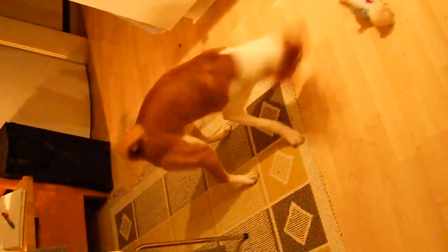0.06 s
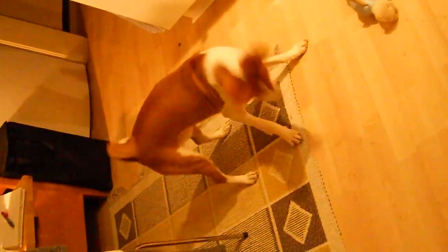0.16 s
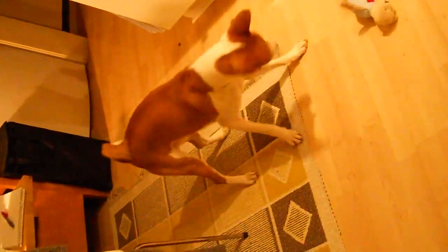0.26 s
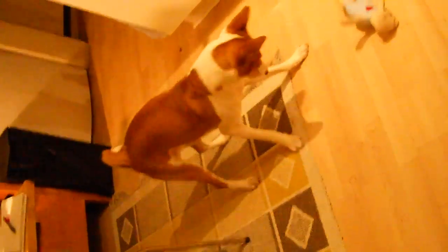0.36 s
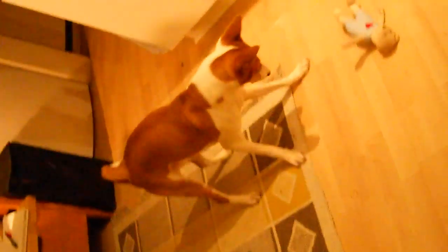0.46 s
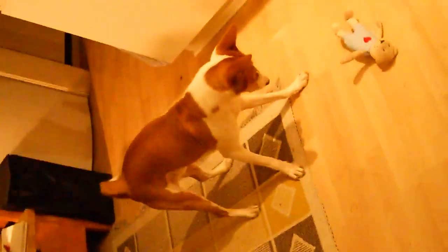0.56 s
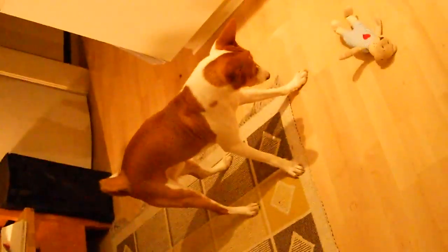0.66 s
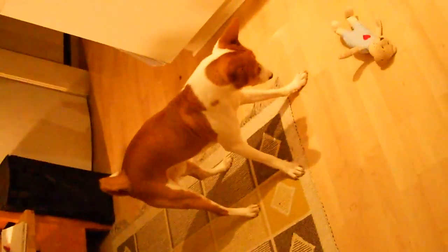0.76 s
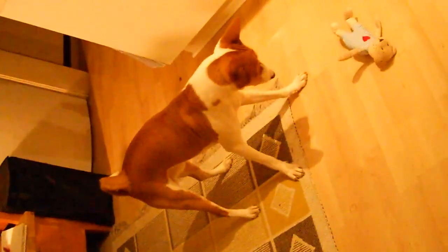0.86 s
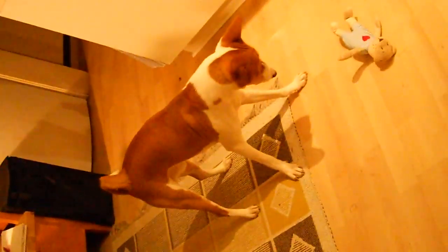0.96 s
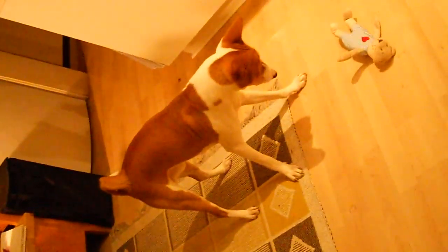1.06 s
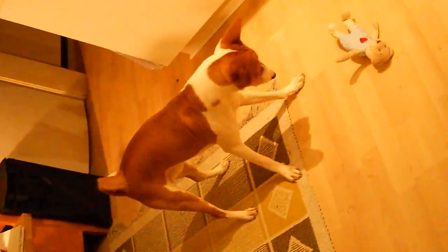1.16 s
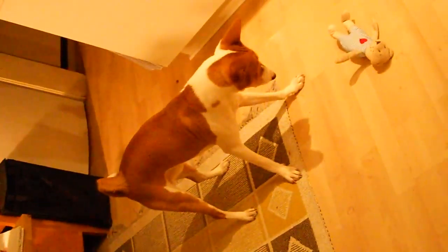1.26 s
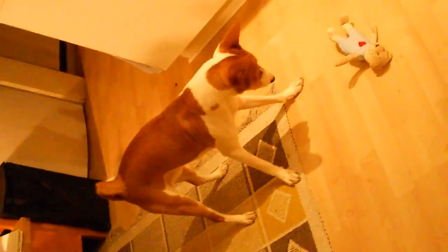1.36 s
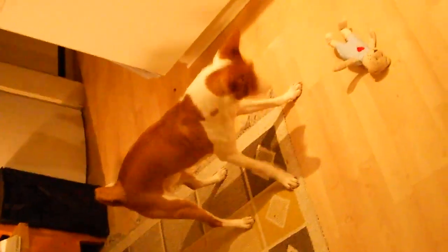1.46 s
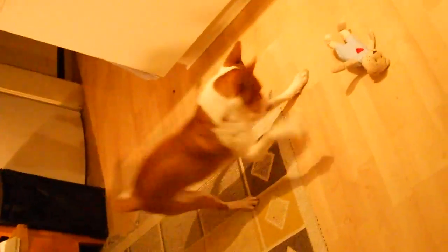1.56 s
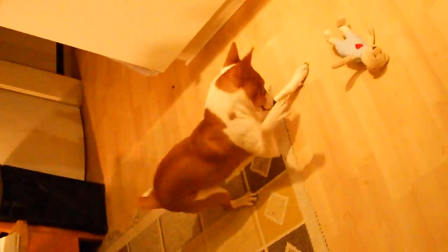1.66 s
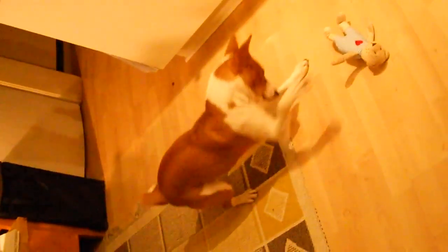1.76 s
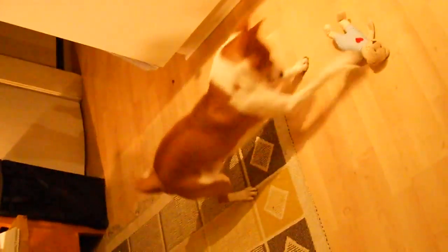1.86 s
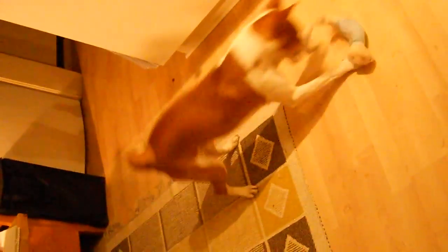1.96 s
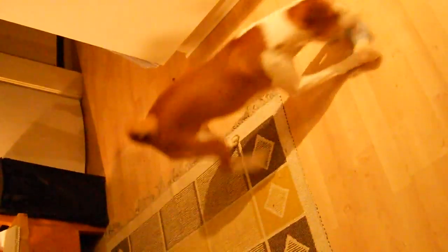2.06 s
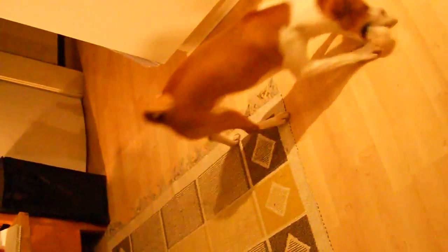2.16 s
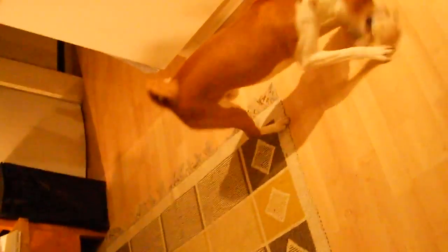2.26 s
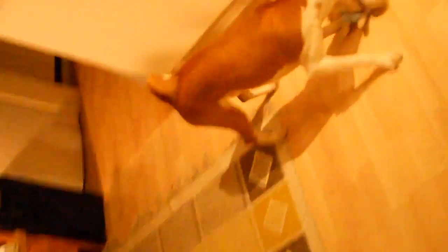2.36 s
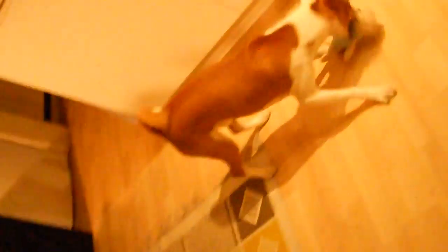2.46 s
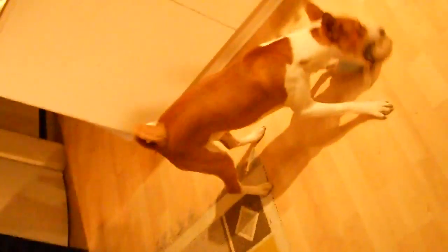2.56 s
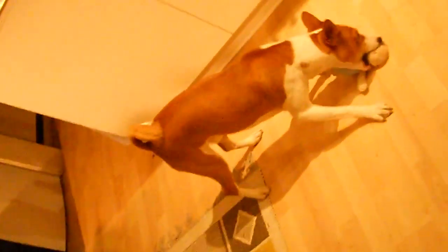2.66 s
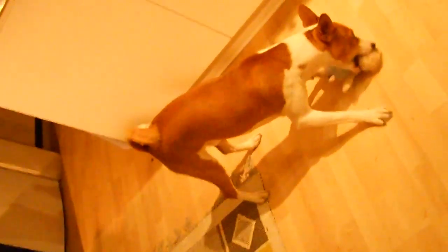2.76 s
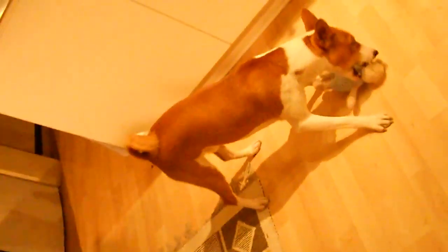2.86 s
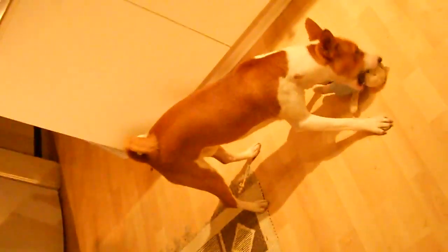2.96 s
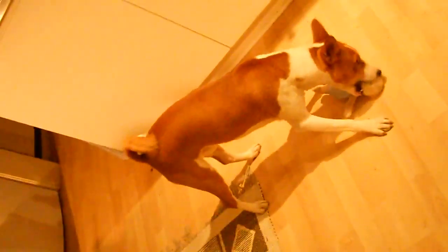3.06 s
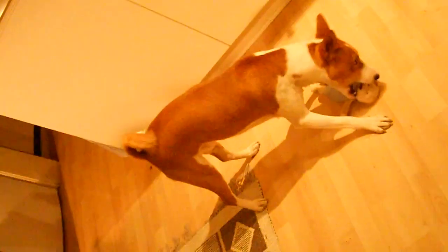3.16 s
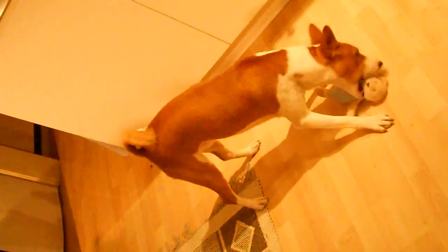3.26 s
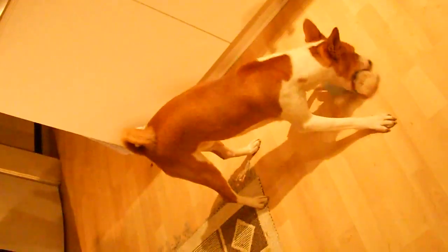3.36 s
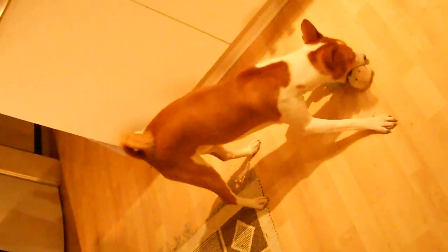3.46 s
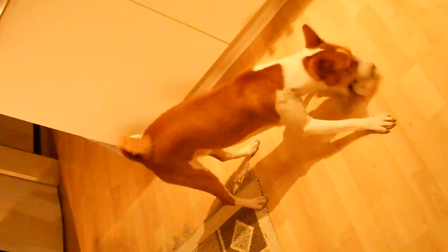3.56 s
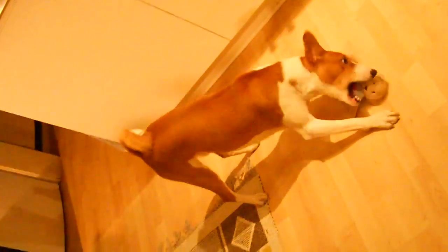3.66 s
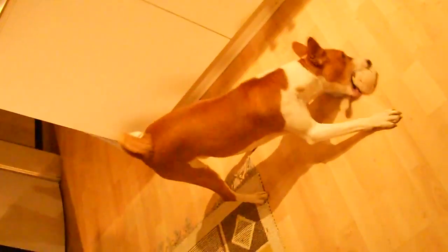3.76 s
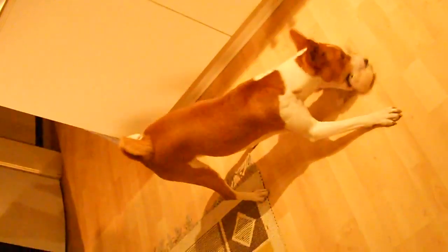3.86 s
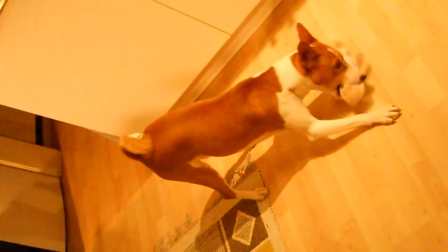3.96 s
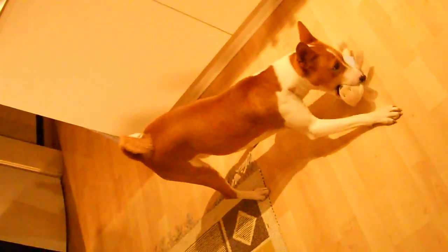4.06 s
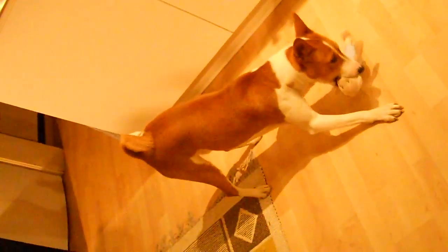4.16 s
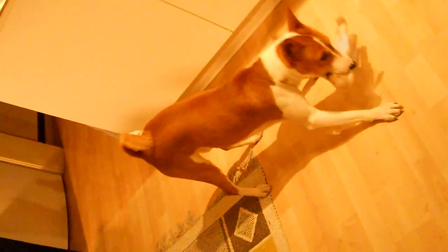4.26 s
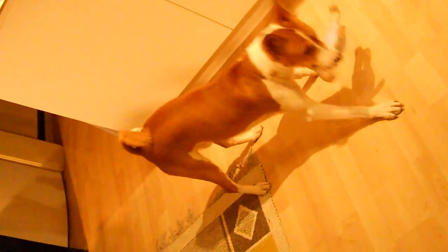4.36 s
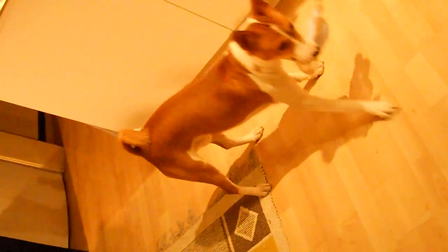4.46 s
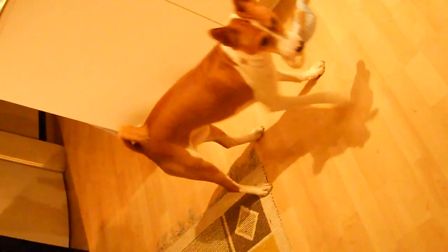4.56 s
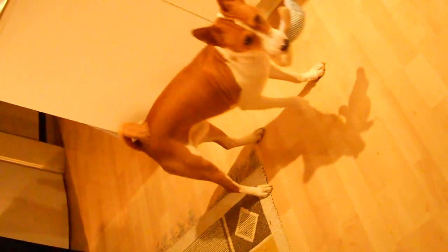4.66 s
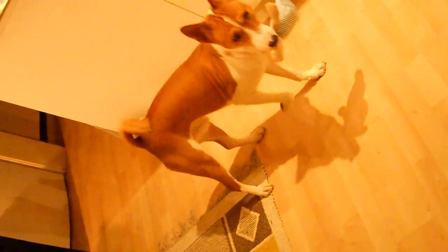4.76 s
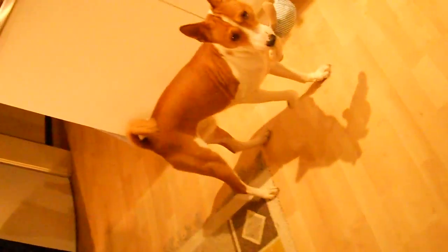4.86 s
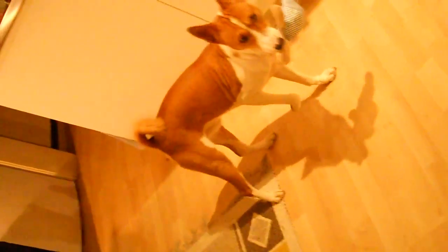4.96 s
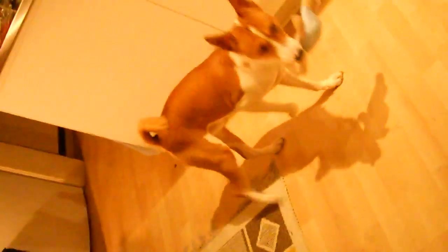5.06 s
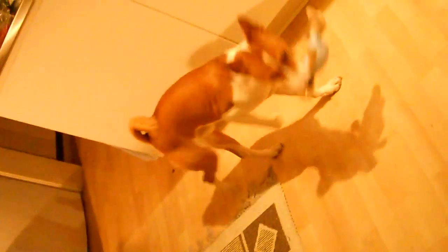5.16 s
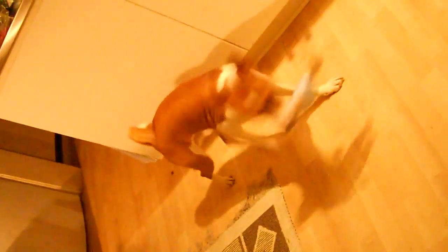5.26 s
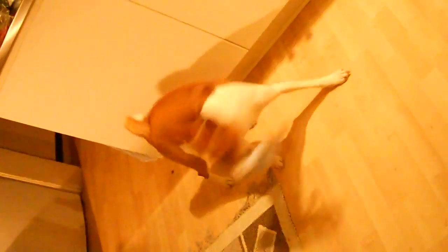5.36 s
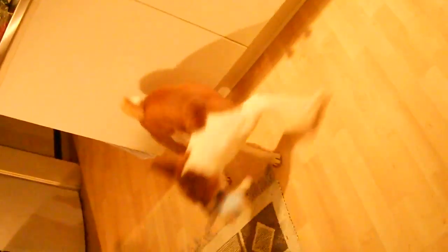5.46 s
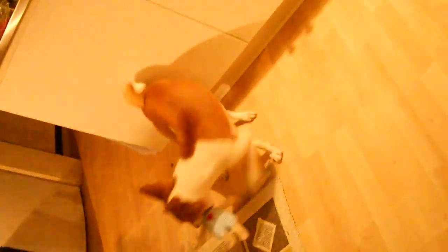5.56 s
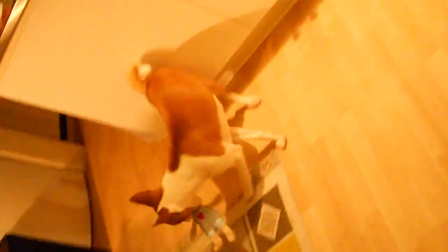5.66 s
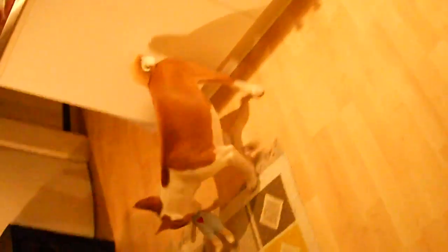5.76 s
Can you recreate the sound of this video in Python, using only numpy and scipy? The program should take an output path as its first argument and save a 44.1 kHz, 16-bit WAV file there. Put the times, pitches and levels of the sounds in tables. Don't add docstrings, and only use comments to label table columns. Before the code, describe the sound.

In a small hard room, paws skid and claws click on floorboards, with one hard pounce, quiet rustles, then a burst of clattering landings.

```python
import sys
import numpy as np
from scipy import signal
from scipy.fft import rfft, irfft, next_fast_len
from scipy.io import wavfile
from scipy.ndimage import uniform_filter1d

SR = 44100
rng = np.random.default_rng(int(sys.argv[2]) if len(sys.argv) > 2 else 0)


def voltage_ratio(decibels):
    exponent = np.asarray(decibels, float) / 20
    return 10 ** exponent


def transcribe(signal):
    frames = np.atleast_2d(signal).T
    limited = np.clip(frames, -1, 1)
    pcm = np.round(limited * 32767).astype(np.int16)
    wavfile.write(sys.argv[1], SR, pcm)


N = 255780


def claws(tails, crack_db=-3, crack_ms=1.0):
    # pitch_hz [Hz], level_db [dB per Hz]
    spot_colours = [
        [(410, -17), (1440, -4), (2000, -6), (2600, -14), (3200, -5), (4200, -8.5), (10200, -12), (13000, -42)],
        [(800, -16.5), (1500, -15.5), (3500, -6.5), (5900, 0.5), (7200, -5), (8400, 1.5), (11000, -10.5),
         (13000, -21)],
        [(410, -47), (900, -11), (2610, -22), (3600, -12.5), (5300, -1.2), (8100, -11), (10600, -7.5),
         (13000, -26)],
        [(500, -43), (1000, -22), (1760, -19), (2800, -7), (4350, 1), (7520, -2), (10600, -2), (13000, -20)],
        [(410, -62), (1000, -14), (1740, -12), (2240, -22), (2640, -5), (4200, 2), (10600, -0.6), (13000, -14)],
        [(410, -50), (700, -33), (1250, -9), (1900, -15.5), (3570, -3), (7180, -1.5), (11300, 1), (13000, -25)],
    ]
    t = np.arange(-40, 300) / SR
    after = np.maximum(t, 0)
    rise = np.exp(-(np.minimum(t, 0) / 0.00016) ** 2)
    crack_shape = rise * np.exp(-after / (crack_ms / 1000))
    out = np.zeros(N)
    for spot, (colour, tail) in enumerate(zip(spot_colours, tails)):
        rows = contacts(spot)
        back = coloured(tail, colour) * (1 - np.exp(-np.arange(len(tail)) / 40))
        back = back / np.linalg.norm(back)
        grits = rng.standard_normal((len(rows), len(t)))
        for (s, db, hz, ring_ms, room_db), grit in zip(rows, grits):
            envelope = rise * np.exp(-after / (ring_ms / 1000))
            tick = envelope * np.cos(2 * np.pi * hz * (t - 120 * t ** 2))
            tick = tick - envelope * tick.sum() / envelope.sum()
            crack = evened(coloured(grit, colour)) * crack_shape
            add(out, s + t[0], voltage_ratio(db) * (1.18 * tick + voltage_ratio(crack_db) * crack / 2))
            add(out, s, voltage_ratio(db + room_db) * np.linalg.norm(tick) * back)
    return out


def contacts(spot):
    # start_s [s], level_db [peak dB], pitch_hz [Hz],
    # slap_lag_ms [ms], slap_db [dB re tip]
    landings = [
        [(1.5956, -19.5, 8160, 1.7, -20)],
        [(1.9349, -2.5, 8900, 1.5, -13), (1.9373, 2, 8550, 2.3, -17)],
        [(5.2426, -13.5, 9010, 0.54, 4), (5.2446, -20.5, 6050, 1.9, -13)],
        [(5.3901, -4, 9540, 2, -6.5), (5.3933, -14.5, 7800, 1.2, -6)],
        [(5.4866, -22, 9200, 1.84, 2.5), (5.4948, -17.5, 9050, 1.21, -4), (5.4975, -12.5, 9000, 2.0, -5)],
        [(5.7457, -12, 8900, 2.4, -2.5), (5.7494, -12, 9000, 2.4, -9), (5.7572, -11, 8300, 2.2, -4)],
    ]
    # tip_ring_ms [ms], slap_ring_ms [ms], room_db [dB]
    landing_rings = [
        (0.2, .3, 12.5),
        (0.21, 0.21, -2),
        (0.24, .95, 3),
        (0.36, 0.22, 1.5),
        (0.31, 0.29, 1.5),
        (0.22, .32, 0.5),
    ]
    # start_s [s], level_db [peak dB], pitch_hz [Hz]
    stray_ticks = [
        [(1.6155, -19, 4020)],
        [(.082, -27, 8000), (.162, -35, 7000), (1.528, -31, 8000), (1.5385, -29, 8500), (1.715, -39, 9200),
         (1.8642, -32, 9200), (1.9252, -25, 9000)],
        [(1.8898, -39, 6200), (2.3188, -25, 6000), (2.3535, -38, 6100), (2.3633, -31, 7000)],
        [(5.693, -39, 5500)],
        [(4.5, -38, 7000), (4.5257, -42, 6700), (5.4854, -22, 8600)],
        [],
    ]
    tick_room_db = [3.5, -1, 4, 11, 3, 0.1]
    slap_pitch = 0.78
    tick_ring_ms = 0.3

    tip_ms, slap_ms, room_db = landing_rings[spot]
    tips, slaps = [], []
    for s, db, hz, lag_ms, slap_db in landings[spot]:
        tips.append((s, db, hz, tip_ms, room_db))
        slaps.append((s + lag_ms / 1000, db + slap_db, slap_pitch * hz, slap_ms, room_db))
    ticks = [(s, db, hz, tick_ring_ms, tick_room_db[spot]) for s, db, hz in stray_ticks[spot]]
    return tips + slaps + ticks


def skids(tail, slips_per_s=12000, spread_db=2.3):
    # peak_s [s], level_db [dB], rise_s [s], fall_s [s], brightness [0-1]
    strokes = [(.115, -35.5, 0.16, 0.13, 0.72), (1.545, -26.5, .022, 0.055, 0.98),
               (1.53, -40.5, 0.036, .03, .85), (2.19, -46, 0.071, 0.085, 0.5), (2.25, -48, 0.77, .3, 0.81),
               (2.317, -38, .05, 0.19, .82), (2.42, -44, .06, 0.21, 0.5), (3.354, -49, .12, .5, 0.58),
               (3.775, -44.5, .05, .06, 0.35), (3.87, -51, 0.47, 0.28, 0.9), (4.502, -47.5, 0.03, .045, 1)]
    # pitch_hz [Hz], level_db [dB per Hz]
    bright_colour = [(290, -51), (500, -34), (1360, -7.5), (1670, -26), (1810, -17.5), (3920, 1), (7960, 0),
                     (10100, -0.5), (11500, -12), (15000, -51), (22000, -120)]
    # pitch_hz [Hz], level_db [dB per Hz]
    dull_colour = [(120, -2), (300, -1.5), (800, -3), (1800, -4), (3000, -11), (6000, -36), (11500, -19.5)]
    slips = voltage_ratio(spread_db * rng.exponential(1, N)) * rng.choice([-1, 1], N)
    slips = slips * (rng.random(N) < slips_per_s / SR)
    bright = evened(coloured(slips, bright_colour))
    dull = evened(coloured(slips, dull_colour))
    bright_power, dull_power = np.zeros(N), np.zeros(N)
    for peak_s, db, rise_s, fall_s, shine in strokes:
        power = swell(peak_s, db, rise_s, fall_s, bend=1.27) ** 2
        bright_power += power * shine ** 2
        dull_power += power * (1 - shine) ** 2
    out = np.sqrt(bright_power) * bright + np.sqrt(dull_power) * dull
    return voltage_ratio(-1.5) * out + voltage_ratio(-5.0) * signal.fftconvolve(out, tail)[:N]


def knocks(tails):
    rows = blows()
    out = np.zeros(N)
    spread = rng.uniform(-0.85, 1, (len(rows), 3))
    for k, (s, db, hz, t60, room_db) in enumerate(rows):
        blow = ring(hz, t60, 0.06 / hz, size=16000)
        blow += sum(0.17 * ring(hz * 1.41 ** u, 1.06 * t60, 0.34 / hz, size=16000) for u in spread[k])
        add(out, s, voltage_ratio(db) * blow)
        add(out, s, voltage_ratio(db + room_db) * signal.fftconvolve(blow, tails[k % len(tails)]))
    return out


def blows():
    # start_s [s], level_db [peak dB], pitch_hz [Hz]
    near = [(1.595, -29.5, 250), (1.5952, -26.5, 2100), (1.605, -38, 113), (1.616, -29.5, 490),
            (1.628, -23.5, 3050), (1.617, -22, 3000), (1.608, -32, 267), (1.656, -41, 434),
            (1.666, -40, 1450), (1.63, -36, 930), (1.645, -37, 171), (1.9345, -30.5, 547),
            (1.936, -27, 1310), (1.939, -15, 3600), (1.942, -41, 160), (1.94, -38.5, 333),
            (1.94, -36, 1000), (2.19, -51, 590), (2.397, -33.5, 1490), (2.41, -39, 800), (2.427, -39, 463),
            (2.444, -41, 1090), (2.497, -50, 60), (3.212, -53, 70.4)]
    # start_s [s], level_db [peak dB], pitch_hz [Hz]
    far = [(3.77, -47, 1420), (3.775, -43, 550), (3.794, -50, 109), (5.012, -47, 90), (5.039, -45, 496),
           (5.243, -32, 1600), (5.245, -42.5, 193), (5.692, -42.5, 180), (5.698, -45, 500),
           (5.706, -41, 192), (3.8, -47, 190), (5.747, -40, 1570)]
    # start_s [s], level_db [peak dB], pitch_hz [Hz]
    loose = [
        (5.39, -34, 1306),
        (5.391, -25, 3600),
        (5.392, -37.5, 1726),
        (5.487, -39, 1707),
        (5.393, -32, 4450),
        (5.394, -40, 2360),
    ]
    # start_s [s], level_db [peak dB], pitch_hz [Hz]
    toy = [
        (3.396, -41.5, 287.6),
        (3.416, -43, 294),
        (3.451, -40, 249.7),
        (3.477, -46, 289),
    ]
    # t60_s [s at 500 Hz], loss_slope [power of pitch], room_db [dB]
    kinds = [
        (0.031, 0.57, 0.2),
        (0.015, 1, 3),
        (0.04, .02, 6),
        (0.22, .05, -11),
    ]
    # pitch_hz [Hz], room_db [dB]
    room_colour = [(110, -7), (170, -5.5), (260, -1.5), (500, 0.8), (1400, -3.5), (3400, -5.5)]
    rows = []
    for table, (t60, slope, room_db) in zip((near, far, loose, toy), kinds):
        for s, db, hz in table:
            rows.append((s, db, hz, t60 * (500 / hz) ** slope, room_db + read(room_colour, hz)))
    return rows


def sway(sway_hz=23.2):
    # peak_s [s], level_db [dB], rise_s [s], fall_s [s]
    loads = [
        (1.64, -48.5, 0.27, .33),
        (3.82, -52, 0.054, .08),
        (3.9, -59, .1, .3),
        (5.216, -46.5, .16, 0.18),
        (5.37, -47.5, .13, 0.27),
        (5.56, -53, .15, .25),
    ]
    envelope = np.sqrt(sum(swell(*row, bend=2.1) ** 2 for row in loads))
    wobble = uniform_filter1d(uniform_filter1d(rng.standard_normal(N), 4000), 4000)
    hz = sway_hz * (1 + 0.029 * evened(wobble))
    return np.sqrt(2) * envelope * np.sin(2 * np.pi * np.cumsum(hz) / SR)


def room_tails(count, build_s=0.0029):
    # pitch_hz [Hz], t60_s [s]
    decay = [(100, 0.32), (500, 0.27), (2000, 0.3), (5000, 0.3), (8000, 0.23), (11000, 0.3)]
    size = SR // 2
    taps = rng.standard_normal((count, size)) * (rng.random((count, size)) < 0.45)
    hz, t, bands = signal.stft(taps, SR, nperseg=128)
    t60 = np.maximum(read(decay, hz), 0.02)[:, None]
    tails = signal.istft(bands * voltage_ratio(-60 * t / t60), SR, nperseg=128)[1]
    tails *= 1 - np.exp(-(np.arange(tails.shape[1]) / SR / build_s) ** 2)
    return tails / np.linalg.norm(tails, axis=1, keepdims=True)


def hiss(level_db=-47):
    # pitch_hz [Hz], level_db [dB per Hz]
    noise_colour = [(7.1, -30), (12, 2), (27, 1.5), (43, -6), (360, -3.5), (392, -4), (653, -5),
                    (796, -5.5), (1030, -6), (1180, -6.5), (4880, -11.5), (10500, -13.5), (13600, -73),
                    (22000, -120)]
    rest_db, duck_db = -1.41, -3.5
    duck_s, duck_in_s, duck_out_s = 2.47, 0.45, 0.41
    corners_s = [duck_s - duck_in_s, duck_s, duck_s + duck_out_s]
    duck = np.interp(np.arange(N) / SR, corners_s, [0, 1, 0])
    noise = evened(coloured(rng.standard_normal(N), noise_colour))
    return voltage_ratio(level_db + rest_db + duck_db * duck) * noise


def swell(peak_s, db, rise_s, fall_s, bend, depth_db=-25):
    t = np.arange(N) / SR - peak_s
    away = np.where(t < 0, -t / rise_s, t / fall_s)
    return voltage_ratio(db + depth_db * np.minimum(away, 3) ** bend)


def ring(hz, t60, rise_s, size):
    t = np.arange(size) / SR
    x = (1 - np.exp(-t / rise_s)) * voltage_ratio(-60 * t / t60) * np.sin(2 * np.pi * hz * t)
    return x / abs(x).max()


def evened(x):
    return x / np.sqrt(np.mean(x ** 2) + 1e-20)


def read(points, hz):
    f, value = np.transpose(points)
    return np.interp(np.log(hz + 1), np.log(f + 1), value)


def coloured(x, points):
    size = next_fast_len(len(x))
    gain = voltage_ratio(read(points, np.fft.rfftfreq(size, 1 / SR)))
    return irfft(rfft(x, size) * gain, size)[:len(x)]


def add(mix, s, sound):
    part = mix[max(round(s * SR), 0):][:len(sound)]
    part += sound[:len(part)]


def scene():
    # pitch_hz [Hz], level_db [dB]
    mic = [(9500, 0), (10700, -2.5), (11200, -8), (11500, -17), (11850, -45), (12600, -80)]
    tails = room_tails(count=12)
    floor = claws(tails) + knocks(tails) + skids(tails[-1]) + sway()
    return coloured(floor + hiss(), mic)[None]


def low_pass(x):
    return signal.sosfilt(signal.butter(12, 11680, fs=SR, output="sos"), x)


def record(dry):
    # pitch_hz [Hz], level_db [dB]
    band_limit = [(11500, 0), (11850, -28), (12600, -63)]
    rounded = 0.95 * np.tanh(dry[0] / 0.95)
    return low_pass(coloured(rounded, band_limit)[None])


dry = scene()
out = record(dry)
transcribe(out)
```